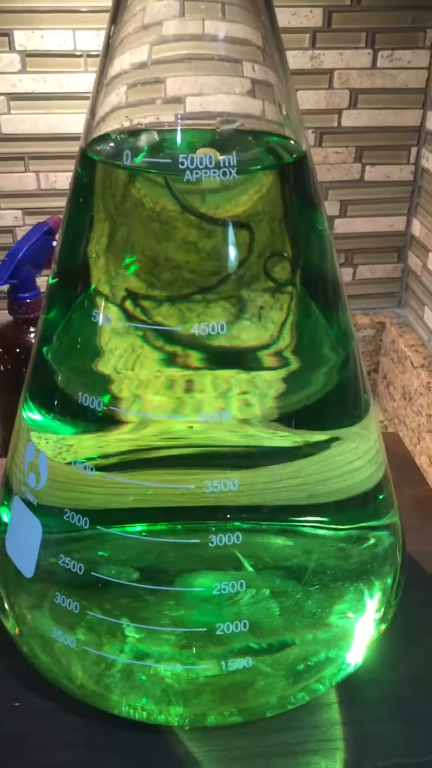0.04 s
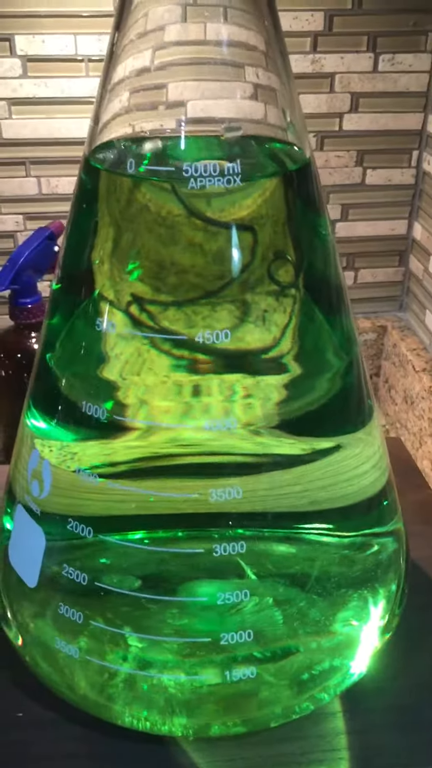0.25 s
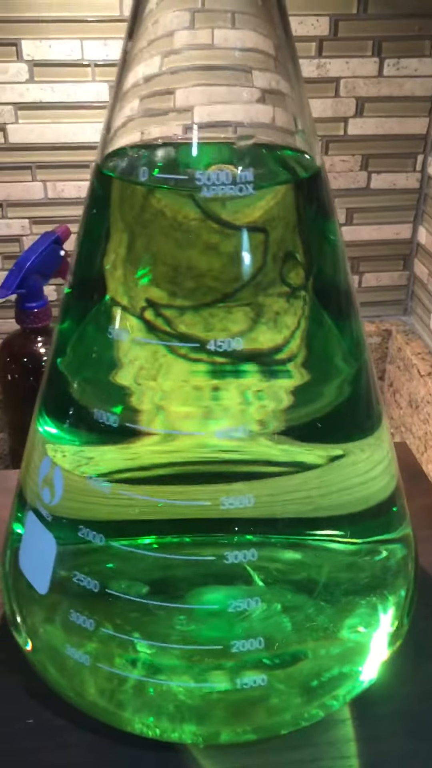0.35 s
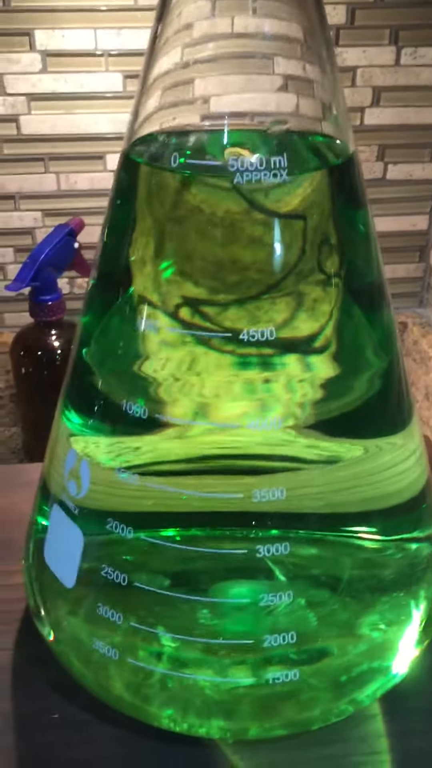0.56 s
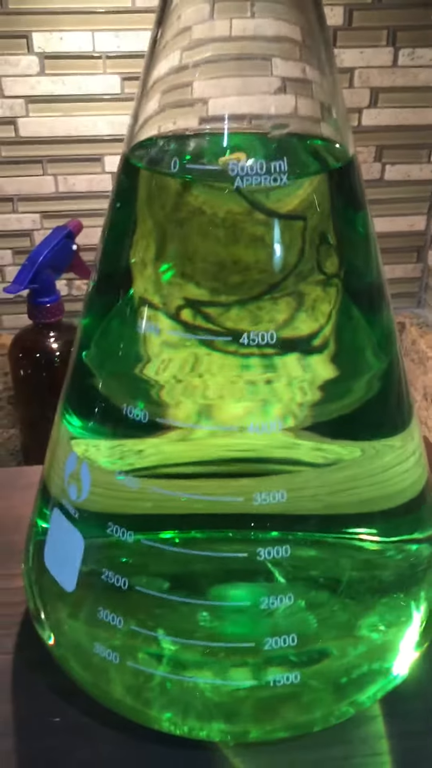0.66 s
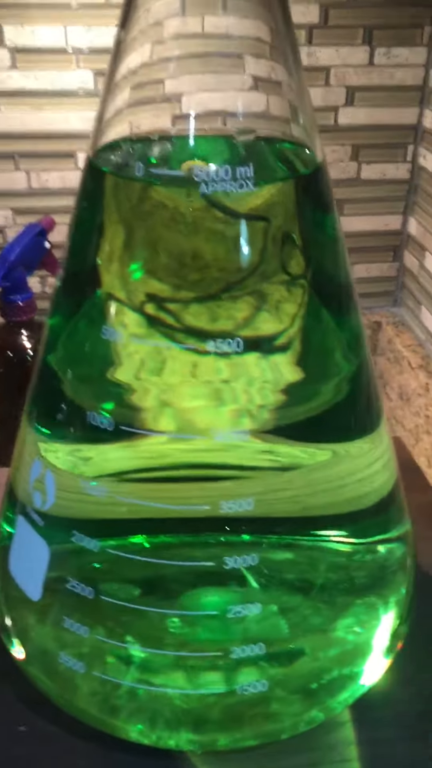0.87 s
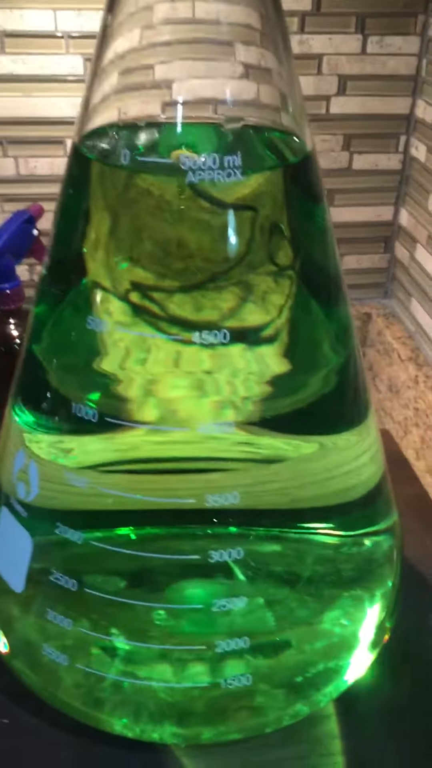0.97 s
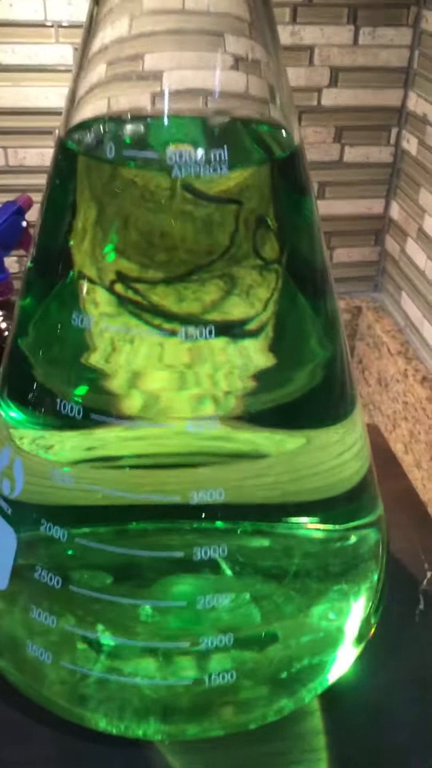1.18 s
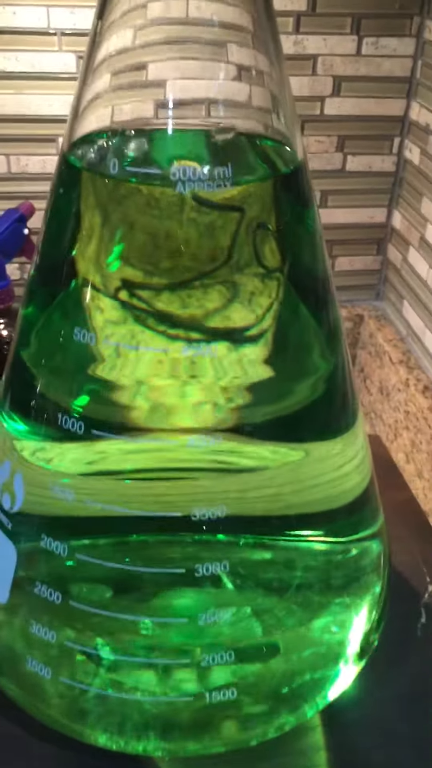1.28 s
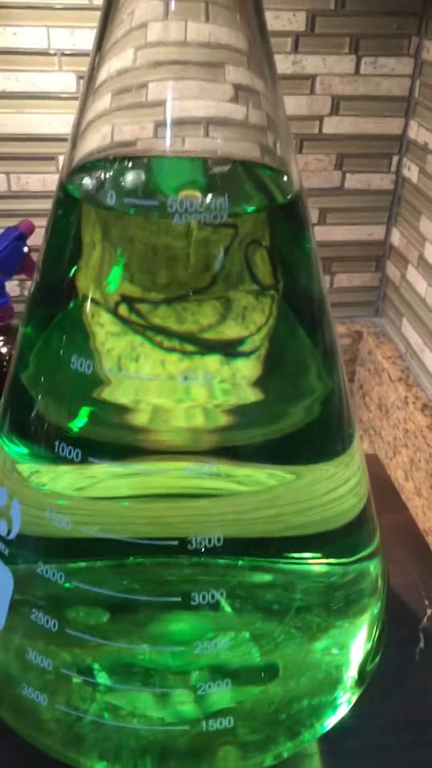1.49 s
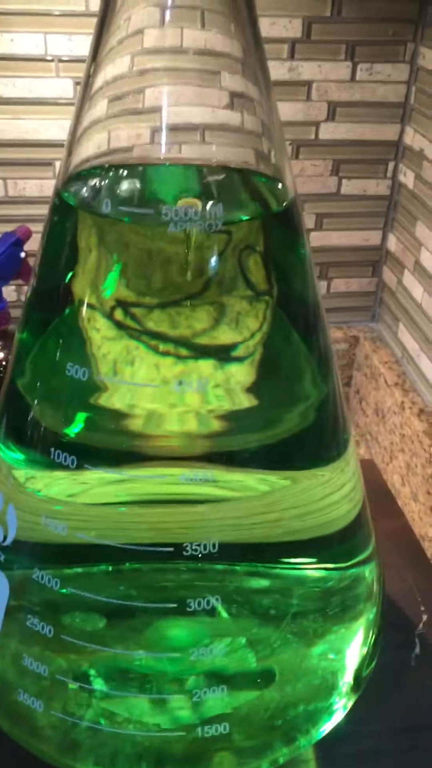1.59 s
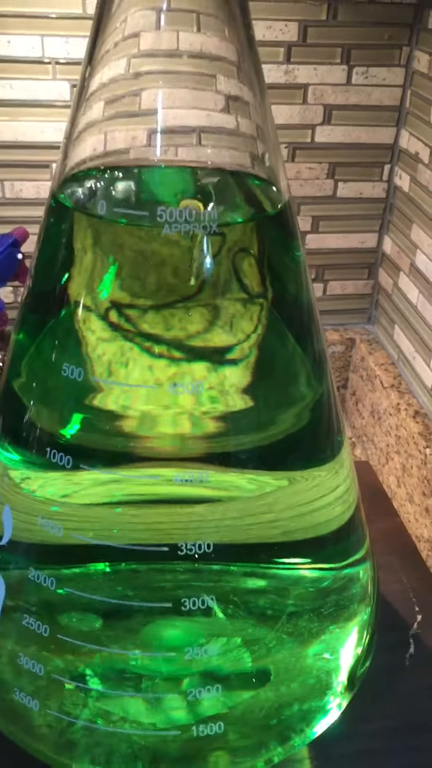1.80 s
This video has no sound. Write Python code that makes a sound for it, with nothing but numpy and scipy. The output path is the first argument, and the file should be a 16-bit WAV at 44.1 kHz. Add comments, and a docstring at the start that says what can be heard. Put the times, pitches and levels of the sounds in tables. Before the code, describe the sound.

Inside a big glass flask of liquid, a stir bar jumps with four hard, bright clacks and rattles faster and fainter until it settles. Light taps ring the glass afterward, while a low motor hum fills the small tiled room.

```python
"""Four hard clacks on glass, then a quickening rattle that dies away: a magnetic stir bar jumps in a
large flask full of liquid until the magnet catches it again. Each hit is a sharp click that scatters
through glass and liquid and sets the flask ringing. Light touches ring it softly before and after.
The stirrer motor hums underneath; counter and tiled walls throw the clicks back into a small room."""
import sys
import numpy as np
from scipy import signal
from scipy.fft import rfft, irfft
from scipy.io import wavfile
from scipy.ndimage import uniform_filter1d

SR = 44100
rng = np.random.default_rng(int(sys.argv[2]) if len(sys.argv) > 2 else 0)


def generate_wav(sig):
    """Save sig (samples, or channels by samples) to the path in sys.argv[1] as 16-bit PCM at SR."""
    pcm = np.round(np.clip(np.atleast_2d(sig).T, -1, 1) * 32767).astype(np.int16)
    wavfile.write(sys.argv[1], SR, pcm)


N = 81585

# The two close pitches of the flask wall. Each row: pitch in Hz, ring time to -60 dB (t60) in seconds.
WALL_MODES = [(4226, 0.084), (4592, 0.16)]
CLACK_ROOM_DB, RATTLE_ROOM_DB = -5.5, -9  # reverb sends
BODY_RISE_S = 0.0035


def clacks(sing_db=-18, sing_t60=0.47):
    """The bar strikes the glass hard: a shrill, cracking contact, then the thud and ring of the flask."""
    # The first two blows fuse into one clack. Each row: start in seconds, level in dB, contact pitch
    # in Hz, contact decay in ms, then the balance in dB of crack, splinter, scatter, thud and wall ring.
    blows = [(0.2149, -30.5, 7300, 0.13, -22, 0, 4, -0.5, -29),
             (0.2159, -19, 7800, 0.17, -1, 9.5, -3.5, -4, -51),
             (0.3386, -2.5, 7270, 0.16, -15.5, -26, -9, -13, -54.5),
             (0.4195, -14, 6430, 0.14, -2, -54, -3.5, -9, -27.5),
             (0.4826, -21.5, 7630, 0.12, -6, 4, -4, -3.5, -31)]
    # Tone of the broad crack, bright splinter and dull thud. Each row: frequency in Hz, relative dB.
    crack_eq = [(300, -21), (900, -7), (1700, -6), (3500, 5.5), (5500, 0.5), (9000, -5.5), (16000, -6.5)]
    splinter_eq = [(3000, -31), (9700, -22.5), (10900, 4), (12050, -3.5), (12600, -1.5), (13400, 3.5),
                   (14600, -3), (15250, 0.5), (16100, -22.5)]
    thud_eq = [(300, -11.5), (600, 1), (1100, -1), (1700, 2), (2100, -3.5), (3300, 2), (5000, -14),
               (9000, -3.5), (16000, -24)]
    # The splinter's ping, the lingering high glass and the short, liquid-damped body of the flask.
    # Each row: pitch in Hz, relative level in dB, t60 in seconds.
    splinter_modes = [(10740, -35, 0.0504)]
    glass_modes = [(5900, -49, 0.26), (6660, -46.5, 0.35), (6620, -47.5, 0.32), (7580, -47.5, 0.32),
                   (7720, -42.5, .3), (7445, -43, 0.27), (6800, -43.5, .3), (7677, -41.5, 0.23),
                   (7520, -45.5, 0.42)]
    body_modes = [(530, -27.5, 0.037), (640, -27, 0.035), (1205, -32, 0.022), (1642, -19, 0.032),
                  (2350, -26, 0.026), (2680, -23, 0.024), (3320, -25.5, 0.022), (3545, -9, .02),
                  (5700, -17.5, .025), (5886, -18.5, 0.028)]
    crack, thud = colour(crack_eq), undb(-8.5) * colour(thud_eq)
    splinter = colour(splinter_eq) + ring(splinter_modes)
    glass = ring(glass_modes)
    body = ring(body_modes) * attack(BODY_RISE_S)
    wall_hz, wall_t60 = WALL_MODES[0]
    out = np.zeros(N)
    for at, db, hz, ms, crack_db, splinter_db, scatter_db, thud_db, wall_db in blows:
        edge = undb(crack_db) * crack + undb(splinter_db) * splinter
        snap = contact(hz, ms * 0.482) + edge  # a shorter, sharper contact feeds the scatter
        spray = undb(scatter_db) * scatter(snap, t60=0.051, rise_s=0.0014, room_db=CLACK_ROOM_DB)
        flask = body + scatter(thud, t60=0.021, rise_s=BODY_RISE_S, room_db=CLACK_ROOM_DB)
        # the wall's lower pitch rings briefly, then sings on faintly
        wall = ring([(wall_hz, wall_db, wall_t60), (wall_hz, wall_db + sing_db, sing_t60)])
        clack = contact(hz, ms) + edge + spray + undb(thud_db) * flask + glass + wall
        add(out, at, undb(db) * clack)
    return out


def contact(hz, decay_ms):
    """The instant bar meets glass: a few shrill cycles that swell and die in about a millisecond."""
    age = clock() * 1000 / decay_ms
    return age * np.exp(1 - age) * np.sin(2 * np.pi * hz * clock())


def knocks(gain_db=-5, rise_s=0.00077, scatter_db=2.5, ping_send_db=-5):
    """The wobbling bar slaps the bottom as it settles: short bursts, each with a brief high ping."""
    # The rattle. Each row: start in seconds, relative level in dB, ping balance in dB.
    slaps = [(.4826, -14.5, 2), (0.5386, -18, -13), (0.56, -20.5, 2), (0.6159, -18, 3.5),
             (0.6435, -25.5, 8), (0.6756, -22.5, 3), (0.7087, -24, 5), (0.726, -27, 7), (0.7528, -25, 3),
             (0.773, -33, 4), (0.7894, -31.5, 5), (.809, -30.5, 0), (0.8172, -33.5, 2), (0.833, -30, -6),
             (0.85, -38, 0), (.857, -50, 3)]
    # Tone of one slap. Each row: frequency in Hz, relative level in dB.
    slap_eq = [(600, -11), (2000, -15.5), (3500, -6), (5000, -8.5), (7400, 4), (8600, 1), (9900, -7),
               (11000, 0.5), (12000, -1), (13500, -10), (15600, -12), (16100, -39.5)]
    # The high ping. Each row: pitch in Hz, relative level in dB, t60 in seconds.
    ping_modes = [(10990, -18.5, 0.016), (11000, -20, 0.018)]
    out, click = np.zeros(N), colour(slap_eq)
    ping = ring(ping_modes) * attack(rise_s)
    for at, db, ping_db in slaps:
        send = click + undb(ping_db + ping_send_db) * ping
        spray = undb(scatter_db) * scatter(send, t60=0.034, rise_s=rise_s, room_db=RATTLE_ROOM_DB)
        add(out, at, undb(db + gain_db) * (click + undb(ping_db) * ping + spray))
    return out


def ticks(scatter_db=-7.5):
    """Between knocks the tip ticks brightly on the wall; the spot hit balances the wall's two pitches."""
    # Taps of the tip. Each row: start in seconds, level in dB, lower and upper wall ring in relative dB.
    taps = [(0.477, -34, -30, -26), (0.5525, -18, -38, -34), (0.5949, -22.5, -34, -44),
            (0.6262, -24.5, -30, -39), (0.6656, -24, -42, -33), (.689, -24.5, -33, -39),
            (0.717, -25.5, -28, -56), (0.7429, -35.5, -21, -43), (0.76, -28, -47, -34),
            (0.785, -33, -29, -33)]
    # Tone of one tap. Each row: frequency in Hz, relative level in dB.
    tap_eq = [(1000, -10.5), (4000, -19), (6500, -6), (8500, -8), (10000, -27), (12000, -2), (13800, 3.5),
              (15000, -6), (15700, -3), (16100, -18)]
    # Its glassy glint. Each row: pitch in Hz, relative level in dB, t60 in seconds.
    glint_modes = [(10650, -25.5, 0.04)]
    out, click = np.zeros(N), colour(tap_eq) + ring(glint_modes)
    for at, db, *wall_db in taps:
        wall = ring([(hz, mode_db, t60) for (hz, t60), mode_db in zip(WALL_MODES, wall_db)])
        spray = undb(scatter_db) * scatter(click, t60=0.029, rise_s=0.00072, room_db=RATTLE_ROOM_DB)
        add(out, at, undb(db) * (click + wall + spray))
    return out


def touches(attack_s=0.005, blur_db=-14):
    """Soft contacts wake only the flask's low modes; the spot sets their mix, the liquid blurs them."""
    # Low modes of the flask. Each row: pitch in Hz, t60 in seconds.
    flask_modes = [(1560, 0.055), (1610, 0.295), (2546, 0.1), (3122, 0.069), (4560, 0.1)]
    # Light touches. Each row: start in seconds, then the level in dB of each flask mode in turn.
    plinks = [(0.165, -39, -47, -41.5, -50, -89), (1.351, -60.5, -74, -79.5, -81, -90),
              (1.481, -44, -51, -73, -61, -83), (1.565, -47.5, -82, -41.5, -47.5, -59.5),
              (1.609, -57, -53.5, -78.5, -77, -90.5)]
    out, fade_in = np.zeros(N), np.minimum(clock() / attack_s, 1)
    for at, *levels in plinks:
        plink = fade_in * ring([(hz, db, t60) for (hz, t60), db in zip(flask_modes, levels)])
        blur = conv(plink, burst(t60=0.04, rise_s=BODY_RISE_S))
        add(out, at, plink + undb(blur_db) * blur)
    return out


def scatter(click, t60, rise_s, room_db, crossover_hz=8930):
    """A click scatters through glass and liquid and feeds a room that soaks up the treble sooner."""
    # Tone of the room tail. Each row: frequency in Hz, relative level in dB.
    room_eq = [(300, -5.5), (2000, -1.5), (4000, -6), (7000, 1), (11000, -3), (16000, -4)]
    low = cut(burst(t60=0.38, rise_s=0.006), crossover_hz, "lowpass")
    high = cut(burst(t60=0.289, rise_s=0.006), crossover_hz, "highpass")
    tail = conv(low + high, colour(room_eq))
    return conv(click, burst(t60, rise_s) + undb(room_db) * tail)


def stirrer(noise_db=-50, rumble_hz=452, bass_hz=92, drift_rad=0.4, waver_db=3):
    """The motor's wavering hum and an uneven rumble swell together, with a murmur and faint hiss."""
    # Tones of the motor hum, then the shape of the noise bed. Each row: frequency in Hz, relative dB.
    hum_tones = [(60, -65.5), (119.5, -57.5), (140, -61), (240, -58), (360, -68), (480, -78)]
    noise_eq = [(15, -58), (25, -44), (52, -9.5), (123, -1.5), (161, -4), (236, -3), (270, -5.5), (326, -8),
                (451, -18.5), (641, -16.5), (775, -27.5), (1440, -26), (1560, -26.5), (1840, -29),
                (2280, -30), (3250, -35), (16000, -50.5)]
    # Fader rides for hum with rumble, and for the deepest bass. Each row: time in seconds, gain in dB.
    drone_ride = [(0, 2.5), (.08, -.5), (.16, 4), (.25, 0.5), (.35, 0), (.41, -4), (.48, 0.5), (.63, 0),
                  (.76, 3), (.87, -2), (1.0, 1.5), (1.12, 3), (1.28, -2), (1.40, 2.5), (1.53, -1),
                  (1.63, -1), (1.74, 0), (1.85, -2.5)]
    bass_ride = [(0, -12), (.2, -14), (.35, 8), (.5, -11), (.62, 3), (.88, 1), (.94, 10.5), (1.06, -12),
                 (1.17, 0.5), (1.23, -6), (1.42, 0), (1.5, -7), (1.57, 7), (1.68, 5), (1.74, -3.5),
                 (1.82, 6.5)]
    bed = undb(noise_db) * conv(rng.standard_normal(N), colour(noise_eq))
    rumble, bass = below(bed, rumble_hz), below(bed, bass_hz)
    hiss = bed - rumble
    drone = (rumble - bass) * undb(0.36 * wander(15))
    for hz, db in hum_tones:
        phase = 2 * np.pi * (hz * clock() + rng.random()) + drift_rad * wander(7.2)
        drone += np.sqrt(2) * undb(db + waver_db * wander(12)) * np.sin(phase)
    return drone * fader(drone_ride) + bass * fader(bass_ride) + murmur() + hiss


def murmur(waver_db=3):
    """A few resonances keep murmuring: narrow, wavering bands of noise."""
    # The resonances. Each row: centre in Hz, width in Hz, base level in dB.
    bands = [(643.4, 33, -69), (992, 80, -72), (1605, 30, -76.5), (1704, 30, -77.5)]
    # Fader ride for the lowest band. Each row: time in seconds, gain in dB.
    lowest_ride = [(0, -0.5), (.6, -2), (.9, 1.5), (1.22, 4.5), (1.28, -3), (1.375, 13), (1.42, -1.5),
                   (1.465, 9), (1.51, -1), (1.85, -5)]
    t, voices = clock(), []
    for hz, width, db in bands:
        resonance = unit(np.exp(-np.pi * width * t) * np.sin(2 * np.pi * hz * t))
        level = undb(db + waver_db * wander(6.4))
        voices.append(level * conv(rng.standard_normal(N), resonance))
    return voices[0] * fader(lowest_ride) + sum(voices[1:])


def ring(modes):
    """Struck modes as decaying sines, from (Hz, dB, t60) rows."""
    return sum(undb(db) * fade(t60) * np.sin(2 * np.pi * hz * clock()) for hz, db, t60 in modes)


def colour(points, size=8192):
    """Minimum-phase click of unit energy whose spectrum follows (Hz, dB) points."""
    hz, db = np.array(points).T
    freqs = np.maximum(np.arange(size // 2 + 1) * SR / size, 1)
    gain = undb(np.interp(np.log(freqs), np.log(hz), db))
    cepstrum = irfft(np.log(gain))
    cepstrum[1:size // 2] *= 2  # folding packs the energy into the attack
    cepstrum[size // 2 + 1:] = 0
    click = irfft(np.exp(rfft(cepstrum)))
    return np.pad(unit(click), (0, N - size))


def burst(t60, rise_s):
    """Dense random reflections that build up and die away."""
    return unit(rng.standard_normal(N) * fade(t60) * attack(rise_s))


def attack(rise_s):
    """Exponential rise from silence to full level."""
    return 1 - np.exp(-clock() / rise_s)


def fade(t60):
    """Exponential decay by 60 dB in t60 seconds."""
    return np.exp(-np.log(1000) * clock() / t60)


def fader(points):
    """Gain that glides through (seconds, dB) points."""
    return undb(np.interp(clock(), *np.array(points).T))


def wander(rate_hz):
    """Smooth random drift with a spread near 1."""
    hold = int(SR / rate_hz)
    steps = np.repeat(rng.standard_normal(N // hold + 1), hold)
    return unit(uniform_filter1d(steps, hold)[:N]) * np.sqrt(N)


def cut(x, hz, kind):
    """One side of a fourth-order crossover."""
    return signal.sosfilt(signal.butter(4, hz, kind, fs=SR, output="sos"), x)


def below(x, hz):
    """The part of a sound below a frequency, with no delay."""
    return signal.sosfiltfilt(signal.butter(4, hz, fs=SR, output="sos"), x)


def conv(x, response):
    """Pass a sound through a response."""
    return signal.fftconvolve(x, response)[:N]


def add(out, at, x):
    """Mix a sound in at a time in seconds."""
    start = int(round(at * SR))
    out[start:] += x[:N - start]


def undb(db):
    """Decibels to gain."""
    return 10 ** (np.asarray(db) / 20)


def unit(x):
    """Scale to unit energy."""
    return x / np.sqrt(np.sum(x ** 2))


def clock():
    """Seconds at each sample."""
    return np.arange(N) / SR


def scene():
    """Bar and flask with their nearest reflections, over the stirrer, in mono."""
    # Early reflections off counter and tiles. Each row: delay in ms, level in dB.
    echoes = [(4.9, -18.5), (6.1, -20.5), (8.8, -23.5)]
    background = stirrer()
    bar = clacks() + knocks() + ticks()
    out = bar + touches() + background
    for ms, db in echoes:
        add(out, ms / 1000, undb(db) * bar)
    return out[None]


def record(dry, top_hz=16300):
    """The microphone cuts the very top."""
    return signal.sosfilt(signal.ellip(10, .2, 70, top_hz, fs=SR, output="sos"), dry)


dry = scene()
out = record(dry)
generate_wav(out)
```